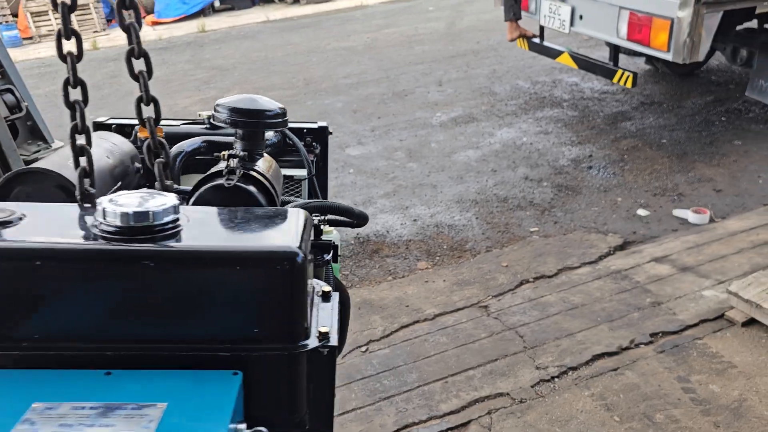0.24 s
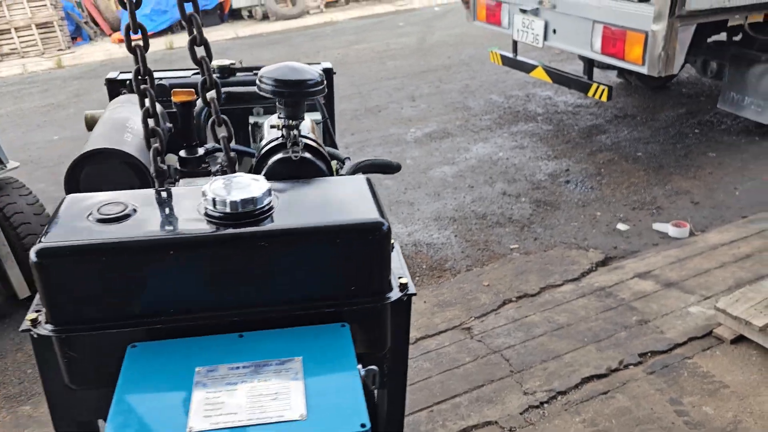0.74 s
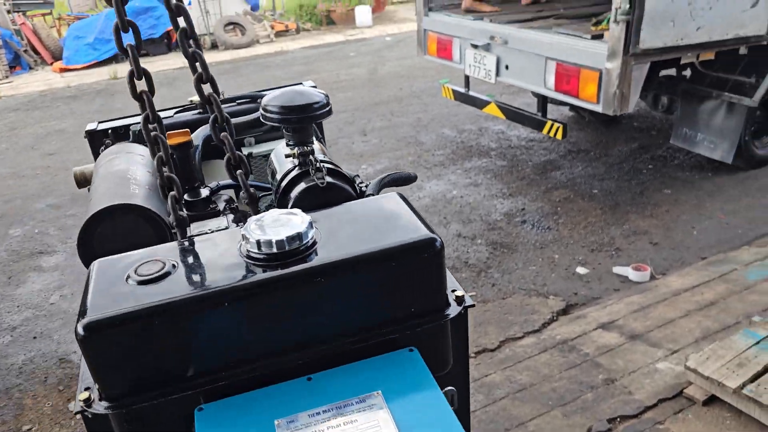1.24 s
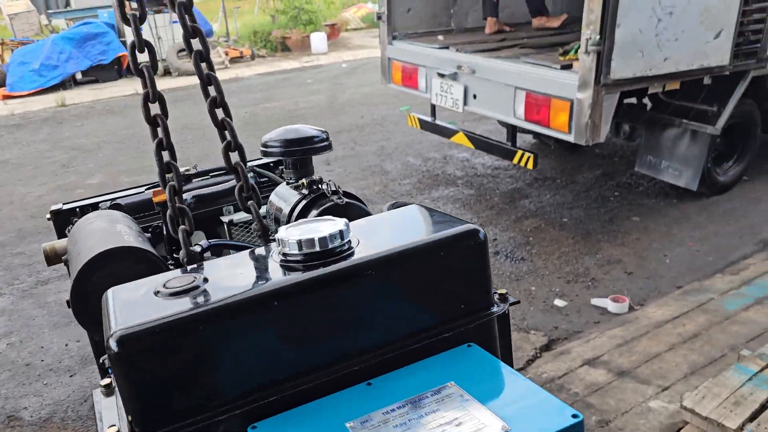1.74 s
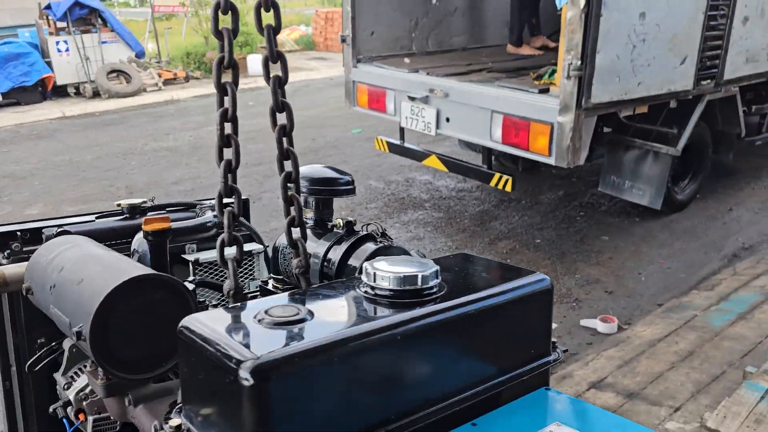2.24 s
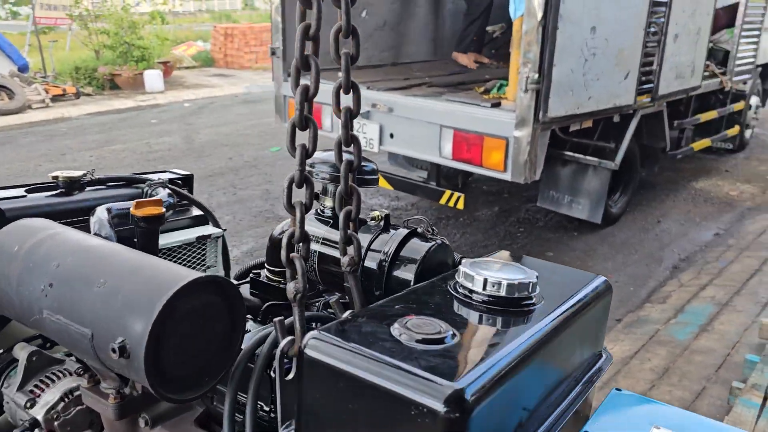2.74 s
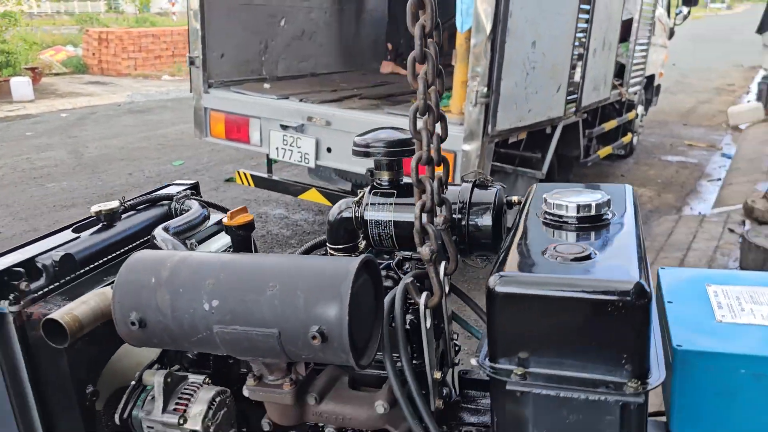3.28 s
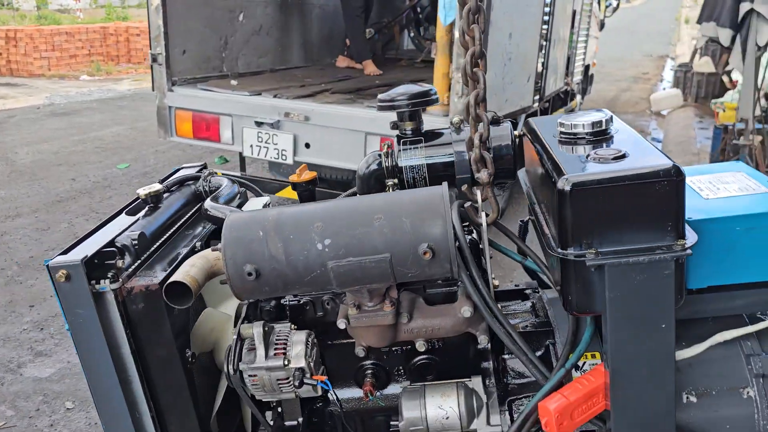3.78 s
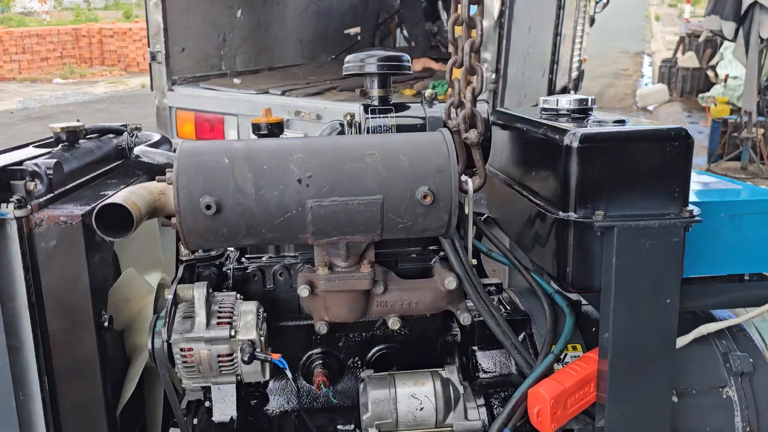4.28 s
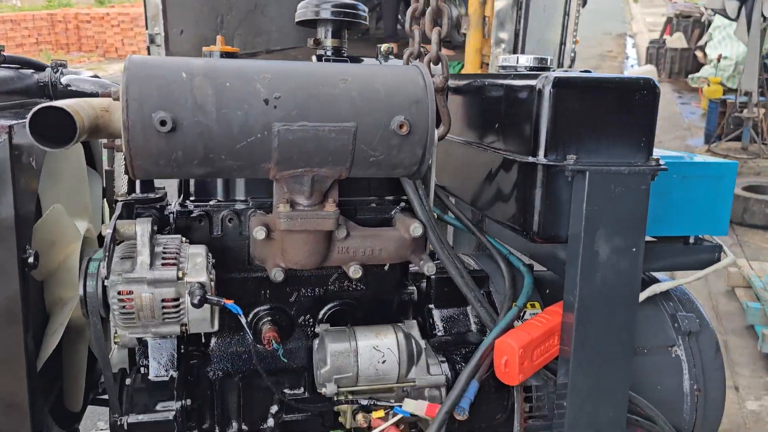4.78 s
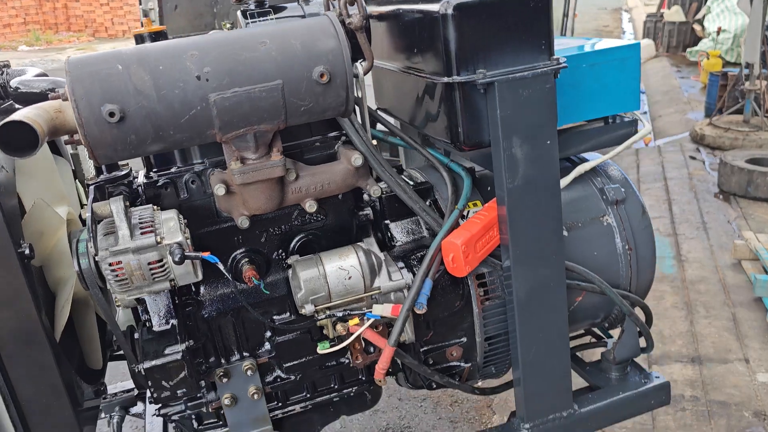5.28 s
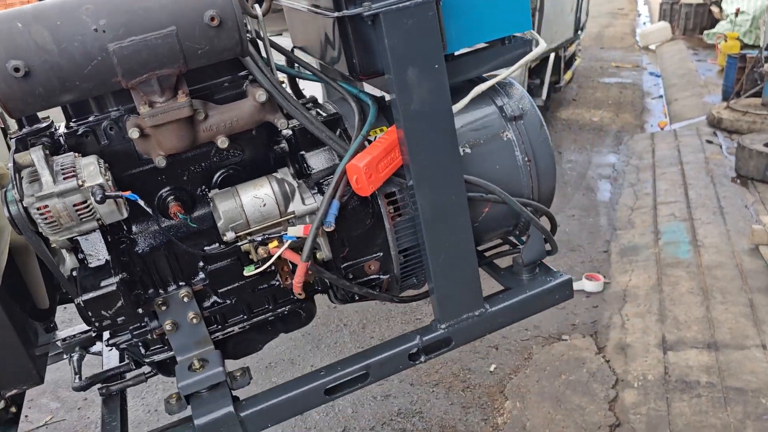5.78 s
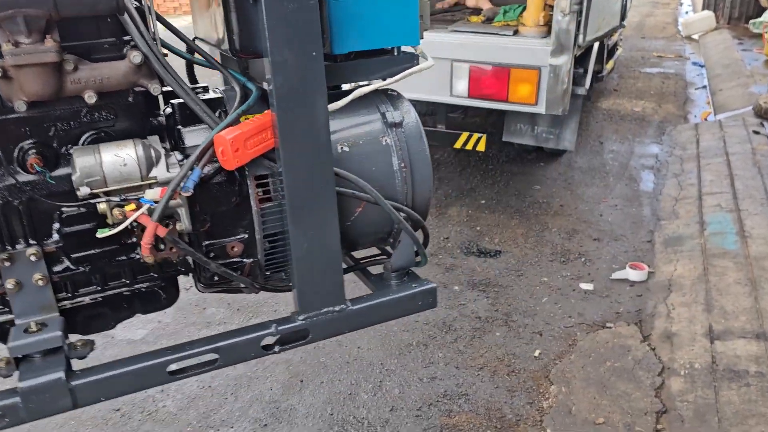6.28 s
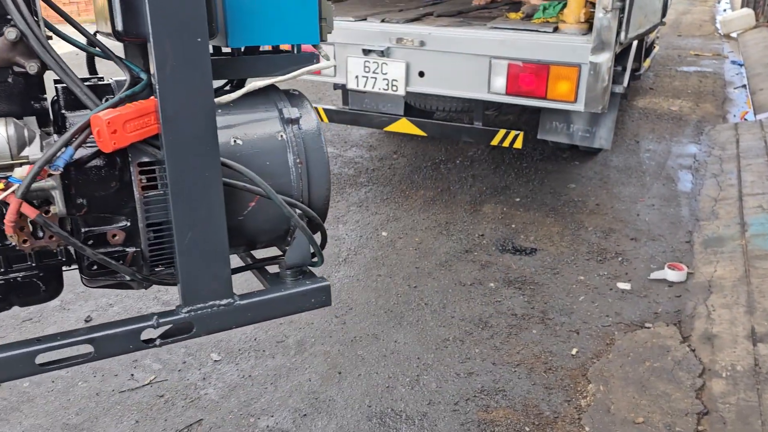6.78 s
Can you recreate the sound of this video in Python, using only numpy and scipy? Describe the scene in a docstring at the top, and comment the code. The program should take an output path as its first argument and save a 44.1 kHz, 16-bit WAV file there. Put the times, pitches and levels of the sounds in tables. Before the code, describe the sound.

A diesel forklift lifts a heavy load on chains, heard close up on a street with a faint rush of air behind. For the first two seconds the engine swells and sags in deep surges, about three a second, knocking, clattering and puffing exhaust. A high, raspy, turbine-like whine throbs with it throughout. A hydraulic valve hisses softly until about 3 seconds. At 0.7 seconds the chain snaps taut and the mast squeals thinly, with link clinks through 1.5 seconds. From 2 seconds the engine speeds up, with another chain clack near 2.4, then settles into steadier chugging by 3.5. The mast rubs in rough, falling tones from about 3.9 to 5.6 seconds, with a sharp clink at 4.4 and lighter ones around 6. Near 6.7 seconds the engine surges hard and the hanging load clanks once, with two clinks and a brief, lower squeal.

```python
"""A street, one microphone close to a diesel forklift hoisting an engine-driven generator on chains.
At first the engine hunts in deep surges: each firing knocks the block, puffs the exhaust and swells
a high turbine-like whine. Oil hisses in the lift valve; at 0.7 s the chain snaps taut, links clink
and the mast squeals. From 2 s the engine pulls up in speed, settling by 3.5 s; then the mast rubs
again. Near 6.7 s the engine surges hard and the hanging load clanks once."""
import sys
import numpy as np
from scipy import signal
from scipy.fft import rfft, irfft, next_fast_len
from scipy.io import wavfile
from scipy.ndimage import uniform_filter1d, minimum_filter1d, map_coordinates

SR = 44100
rng = np.random.default_rng(int(sys.argv[2]) if len(sys.argv) > 2 else 0)


def materialize(psi):
    """Save the field psi as 16-bit PCM at rate SR to the path in sys.argv[1].

    A 1-D psi becomes a single channel; in a 2-D psi each row is a channel.
    """
    bounded = np.clip(np.atleast_2d(psi).T, -1, 1)
    quanta = np.round(bounded * 32767).astype(np.int16)
    wavfile.write(sys.argv[1], SR, quanta)


N = 309582
TIME = np.arange(N) / SR
AGE = np.arange(8192) / SR  # seconds into one blow

# Levels in the tables are relative.
# mean crank speed: t/s, firing rate/Hz
FIRING_RATE = [(0.0, 21.816), (0.258, 22.152), (0.77, 21.775), (0.956, 20.936), (1.308, 20.655),
               (2.045, 23.772), (2.333, 24.694), (2.546, 25.205), (2.962, 25.837), (3.167, 24.127),
               (3.43, 20.476), (3.867, 20.775), (4.255, 20.133), (4.451, 20.699), (5.544, 20.637),
               (6.083, 20.541), (6.764, 20.737), (7.02, 19.031)]
# the hunting governor's fuel surges: t/s, knock/dB, clatter/dB, depth of the following sag/dB
SURGES = [(0.0, -39.5, -43, 12.5), (0.377, -23, -31, 28), (0.705, -18, -18.5, 27.0),
          (1.06, -10, -17.4, 32.5), (1.445, -10, -18, 24.5), (1.737, -12.5, -24, 10),
          (2.158, -14.5, -26.5, 7.5), (2.484, -15.5, -23.5, 6), (2.802, -15, -24.5, 3),
          (3.12, -15, -28, 4.5), (3.509, -15, -26.5, 2.0), (3.877, -11.5, -24.5, 4), (4.28, -12, -27, 5),
          (4.598, -12, -29, 1.9), (4.93, -13, -28, 7), (5.292, -10.5, -27, 8.5), (5.643, -11, -25.5, 11),
          (5.987, -14.5, -27.5, 6.5), (6.313, -16.5, -27.5, 15.5), (6.717, -8, -17, 24.0),
          (7.021, -12, -20, 23)]
# the four cylinders in firing order: knock/dB, clatter/dB
CYLINDERS = [(0.2, 2.8), (-1.1, 0.65), (-1.5, -1.5), (3.5, 2)]
# late ignitions, which knock hard: t/s, extra knock/dB
HARD_KNOCKS = [(.15, 9.5), (.335, 8), (.98, 6.5), (1.36, 9.5), (2.13, 3.5), (2.485, -0.5)]
# engine block resonances: f/Hz, width/Hz, level/dB
BLOCK_MODES = [(407.6, 20, -14.5), (499.1, 13.8, 3), (568.2, 19.3, -3), (695, 8.7, -21), (748.3, 14, -10),
               (788, 11, -4), (863.3, 15.1, -8)]
# clatter of the covers and valve gear: f/Hz, level/dB
COVER_SPECTRUM = [(300, -16), (600, 11), (950, 3), (1170, -4), (1340, 4.5), (1620, 2.5), (1850, -4),
                  (2150, -5), (2500, -13.5), (3500, -9.5), (4400, -32), (5600, -22.5), (6300, -33.5),
                  (6900, -67.5)]
# sheet-metal panel resonances: f/Hz, width/Hz, level/dB
PANEL_MODES = [(1308, 53, 9.5), (1470, 130, 5), (1660, 77, 1.5), (1950, 56, -13.5), (3520, 230, -9)]
# the panels' share of the clatter: t/s, level/dB
PANEL_LEVEL = [(0, -3.5), (3, -5.5), (4.5, 1.5), (6.5, 9)]
# exhaust at the crest of a surge: t/s, tailpipe thump/dB, silencer boom/dB
EXHAUST_LEVEL = [(0, -42.5, -39), (.42, -23.5, -32), (.8, -25, -25.5), (1.12, -22, -21.5),
                 (1.5, -22, -19.5), (1.9, -21.5, -17.5), (2.9, -16.5, -13), (3.4, -19.5, -19),
                 (4.3, -19.5, -19.5), (5.45, -17, -22), (5.6, -25.5, -36.5), (5.95, -35, -31.5),
                 (6.8, -29, -31), (7.02, -26, -27)]
# tailpipe resonances: f/Hz, width/Hz, level/dB
TAILPIPE_MODES = [(53.6, 17.5, -0.88), (85.8, 30, -0.2), (101.6, 15.2, -0.27)]
# silencer resonances: f/Hz, width/Hz, level/dB
SILENCER_MODES = [(176.1, 47, 2.5), (195.6, 29.1, 7.5), (272, 11, -8.5), (358, 150, -13)]
# brightness of the silencer's boom: t/s, tilt/(dB per octave)
BOOM_TILT = [(.4, 4), (2.2, 2), (3.3, -1.5), (5, -7), (7, 0.5)]
# whine pitch at the crest of a surge: t/s, f/Hz
WHINE_PITCH = [(0.0, 3905), (0.3, 3396), (0.85, 3180), (1.05, 2945), (1.4, 2853), (2.1, 2842), (2.3, 2960),
               (2.8, 3054), (3.0, 3184), (3.3, 3142), (3.55, 2964), (4.2, 2852), (4.55, 2747), (5.9, 2752),
               (6.8, 2802.0), (7.02, 2784)]
# whine strength at the crest of a surge: t/s, fundamental/dB, octave/dB
WHINE_LEVEL = [(0.0, -38, -77.3), (0.25, -23, -75), (0.55, -17.5, -59.5), (0.72, -20, -35),
               (1.1, -20, -25.5), (2.2, -25.5, -29.5), (2.55, -22.5, -27.5), (3.2, -26, -39.5),
               (3.7, -19.5, -31), (4.05, -17.5, -34.5), (4.5, -27.5, -37), (5.45, -19.5, -32.5),
               (6.2, -25.5, -38.4), (6.45, -18.5, -28), (7.02, -17, -26.5)]
# chain links settling: t/s, level/dB
CLINKS = [(0.7402, -13), (1.0909, -10.5), (1.477, -7.5), (4.3615, -2.5), (5.7189, -24.5), (6.0591, -16.5),
          (6.4009, -10), (6.7426, -2.5), (6.7915, -1.5)]
# ring of one link: f/Hz, level/dB, t60/s
LINK_MODES = [(4770, -13, 0.02), (5030, -7.5, 0.026), (4900, 5, 0.03), (5160, 1.5, 0.056),
              (6130, -13.5, .03)]
# the hanging frame shifts: t/s, level/dB
CLANKS = [(6.682, -5.5)]
# ring of the frame: f/Hz, level/dB, t60/s
FRAME_MODES = [(704, -10, 0.13), (1140, -12, 0.27), (1410, -4, 0.17), (1970, -4, 0.29)]
# the chain snaps taut: t/s, level/dB
SNAPS = [(0.741, -21), (2.441, -17)]
# mast and lift cylinder rubbing: start t/s, end t/s, start f/Hz, end f/Hz, level/dB
RUBS = [(0.734, 1.024, 2280, 2010, -31), (1.03, 1.277, 2186, 2223, -27), (4.248, 4.501, 915, 890, -24.5),
        (3.901, 5.6, 1205, 977, -29), (5.031, 5.3, 902, 840, -19), (6.663, 6.813, 770, 701, -12.5),
        (6.681, 6.79, 631, 549, -18.5)]
# oil hissing through the lift valve: t/s, level/dB
OIL_LEVEL = [(0, -47), (.3, -53.5), (.48, -40), (.62, -45.5), (1.1, -41.5), (1.3, -45), (1.9, -38),
             (3.5, -59)]
# colour of that hiss: f/Hz, level/dB
OIL_SPECTRUM = [(1200, -21), (1800, 2.5), (2250, -2.5), (2480, -12), (2700, -24.5), (5000, -42)]
# fan and street air: f/Hz, level/dB
AIR_SPECTRUM = [(20, -18.5), (60, -2.5), (200, 6.5), (800, -12.5), (2000, -16), (4000, -37.5), (7200, -64)]

RISE_SHARE = .41  # part of a surge cycle in which the fuel returns
KICK = .26  # extra dB of knock per dB of rise since the last firing
KNOCK_SCATTER_DB, CLATTER_SCATTER_DB, BOOM_SCATTER_DB = 1.07, 1.28, 2.05  # from firing to firing
THUMP_SAG, BOOM_SAG, WHINE_SAG, OCTAVE_SAG = .73, .69, .62, .97  # dB lost per dB of fuel sag
EXHAUST_LAG_S, WHINE_LAG_S, SPOOL_LAG_S = .055, .037, .08  # delays behind the fuel
SAG_HZ_PER_DB = 6  # the turbine slows as the fuel sags
SWING_CYCLES_PER_DB, SWING_LAG = .0021, .305  # crank swing per dB of sag depth; lag in surge cycles


def engine(fired):
    """The main source, close up: combustion rings the block, and the covers clatter with it."""
    knock_db, clatter_db = combustion(fired)
    knocks, rattles = block_knock(fired, knock_db), clatter(fired, clatter_db)
    lit = fired + .0007 * rng.standard_normal(len(fired))  # ignition lag differs from stroke to stroke
    return train(lit, knocks, knock_db, delay=.0026) + train(lit, rattles, clatter_db + 3.04, delay=-.001)


def crank():
    """Firing cycles turned so far, and the firing times; every surge swings the crank ahead and back."""
    phase = surge_phase(TIME)
    depth_db = np.interp(phase - .5, np.arange(len(SURGES)), np.transpose(SURGES)[3])
    swing = SWING_CYCLES_PER_DB * depth_db * np.sin(2 * np.pi * (phase - SWING_LAG))
    cycles = np.cumsum(curves(FIRING_RATE, TIME)[0]) / SR + swing - .36
    return cycles, TIME[1:][np.diff(np.floor(cycles)) > 0]


def surge_phase(at):
    """Surges passed so far, with the fraction of the present one."""
    return np.interp(at, np.transpose(SURGES)[0], np.arange(len(SURGES)))


def fuel_sag(at):
    """How many dB the fuel has fallen: it runs down after a surge and climbs back to the next."""
    passed, part = np.divmod(surge_phase(at), 1)
    depth_db = np.transpose(SURGES)[3][passed.astype(int)]
    return depth_db * np.minimum(part / (1 - RISE_SHARE), (1 - part) / RISE_SHARE)


def combustion(fired):
    """Knock and clatter dB of each firing: the fuel, its cylinder and a little chance."""
    knock_db, clatter_db, _ = curves(SURGES, fired)
    sag_db = fuel_sag(fired)
    knock_db -= sag_db
    knock_db += KICK * np.maximum(np.diff(knock_db, prepend=knock_db[0]), 0)
    for time, extra_db in HARD_KNOCKS:
        knock_db[np.argmin(np.abs(fired - time))] += extra_db
    own_knock_db, own_clatter_db = np.array(CYLINDERS)[np.arange(len(fired)) % len(CYLINDERS)].T
    chance = rng.standard_normal((len(fired), 2)).T
    return (knock_db + own_knock_db + KNOCK_SCATTER_DB * chance[0],
            clatter_db - sag_db + own_clatter_db + CLATTER_SCATTER_DB * chance[1])


def block_knock(fired, knock_db):
    """Each firing rings the block, brighter at the start of a surge, at speed and on soft firings."""
    rise_db = np.clip(np.diff(knock_db, prepend=-45), 0, 18)
    softness_db = np.maximum(-17.5 - knock_db, 0)
    tilt = .5 * rise_db + 1.3 * (curves(FIRING_RATE, fired)[0] - 21) + .53 * softness_db - 1
    push = blows(fired, rough=.73, rise=.001, t60=.084)
    return filtered(push, resonances(BLOCK_MODES, len(fired), spread_db=4, tilt=tilt[:, None]))


def clatter(fired, clatter_db):
    """Piston slap and valve gear rattle the covers and ring the sheet-metal panels."""
    # the hardest firings are also the brightest, the softest are dull
    bright = amp(np.clip(1.6 * (clatter_db + 23.5), -20, 5))[:, None]
    dull = amp(np.clip(.92 * (clatter_db + 29), -12, 0))[:, None]
    above = lambda hz, edge_hz, order=4: hz ** order / (hz ** order + edge_hz ** order)
    treble = lambda hz: (1 + bright * above(hz, 1200)) * (1 + (dull - 1) * above(hz, 850))
    panels = resonances(PANEL_MODES, len(fired), spread_db=8.5)
    panel_gain = amp(curves(PANEL_LEVEL, fired)[0])[:, None]
    # the panels radiate little outside their own range
    band = lambda hz: above(hz, 1100., order=8) / (1 + (hz / 3900) ** 14)
    slap = (1 - np.exp(-(AGE / .006) ** 2)) * (decay(t60=.11) + amp(-16) * decay(t60=.39))
    grit = lambda: slap * rng.standard_normal((len(fired), len(AGE)))
    covers = filtered(grit(), lambda hz: amp(-3) * colour(COVER_SPECTRUM)(hz) * treble(hz))
    return covers + panel_gain * filtered(grit(), lambda hz: panels(hz) * band(hz))


def exhaust(fired):
    """Every puff thumps in the tailpipe and booms in the silencer."""
    thump_db, boom_db = curves(EXHAUST_LEVEL, fired)
    sag_db = fuel_sag(fired - EXHAUST_LAG_S)
    thump_db -= THUMP_SAG * sag_db
    boom_db += BOOM_SCATTER_DB * rng.standard_normal(len(fired)) - BOOM_SAG * sag_db
    # faster running sharpens the puffs and feeds the pipe's upper resonance
    pipe_tilt = 2 * np.clip(curves(FIRING_RATE, fired)[0] - 21, 0, 6)[:, None]
    pipe = resonances(TAILPIPE_MODES, len(fired), spread_db=1.2, tilt=pipe_tilt)
    thump = filtered(blows(fired, rough=.045, rise=.0025, t60=.16), pipe)
    thump = signal.sosfilt(signal.butter(3, [40, 190], "band", fs=SR, output="sos"), thump)
    boom_tilt = curves(BOOM_TILT, fired)[0][:, None]
    silencer = resonances(SILENCER_MODES, len(fired), spread_db=1.5, tilt=boom_tilt)
    boom = filtered(blows(fired, rough=.8, rise=.0044, t60=.11), silencer)
    # the thump and boom start a little early, so each swells to its peak just after the firing
    return train(fired, thump, thump_db, delay=-.01743) + train(fired, boom, boom_db, delay=-.00071)


def turbine_whine(cycles):
    """Each exhaust puff speeds up the turbine and swells its raspy whistle, which sags until the next."""
    pitch = curves(WHINE_PITCH, TIME)[0] - SAG_HZ_PER_DB * fuel_sag(TIME - SPOOL_LAG_S)
    first_db, octave_db = curves(WHINE_LEVEL, TIME)
    sag_db = fuel_sag(TIME - WHINE_LAG_S)
    sway = .01 * np.cos(2 * np.pi * (cycles + .082)) + .011 * wobble(450)
    phase = 2 * np.pi * np.cumsum(pitch * (1 + sway)) / SR
    # at speed the puffs run together, and in a lull the turbine coasts smoothly
    steady = .012 + .006 * np.maximum(curves(FIRING_RATE, TIME)[0] - 21, 0)
    steady += .0016 * np.maximum(sag_db - 14, 0)

    def throb(lead, rise, fall):
        """One swell per firing above the steady level; times in cycles."""
        part = (cycles + lead) % 1
        return unit(steady + (1 - np.exp(-(part / rise) ** 2)) * np.exp(-part / fall))

    def rasp(harmonic, rough):
        """A harmonic that flutters in level and phase."""
        flutter = lambda: rough * wobble(300 * harmonic)
        return unit(np.sin(harmonic * phase) * (1 + flutter()) + flutter() * np.cos(harmonic * phase))

    first_gain = amp(first_db - WHINE_SAG * sag_db - 2) * throb(lead=.07, rise=.24, fall=.13)
    octave_gain = amp(octave_db - OCTAVE_SAG * sag_db - .5) * throb(lead=.015, rise=.1, fall=.21)
    return first_gain * rasp(1, rough=.44) + octave_gain * rasp(2, rough=.43)


def chain_clinks():
    """Links settle under the load with a short, high ring."""
    links = struck_steel(CLINKS, LINK_MODES, scrape_t60=.063)
    return filtered(links, colour([(3000, -5.5), (4500, -3.5), (5500, -5), (6800, -27)]))


def load_clank():
    """The generator's hanging frame shifts and rings."""
    return struck_steel(CLANKS, FRAME_MODES, scrape_t60=.11)


def chain_snaps():
    """A link jerks into place with a dry clack."""
    times, db = np.transpose(SNAPS)
    clack = colour([(1500, -22.5), (3600, 7), (5300, 2), (6800, -29)])
    noise = unit(filtered(rng.standard_normal((len(times), len(AGE))), clack))
    return place(times, amp(db)[:, None] * noise * decay(t60=.051))


def mast_squeal():
    """The mast rubs in rough, mostly falling tones as it takes the weight."""
    squeal = np.zeros(N)
    grip = .18 + wobble(170) + 1j * wobble(170)
    for start, end, from_hz, to_hz, db in RUBS:
        progress = np.clip((TIME - start) / (end - start), 0, 1)
        phase = 2 * np.pi * np.cumsum(from_hz + (to_hz - from_hz) * progress) / SR
        tone = unit(grip.real * np.sin(phase) + grip.imag * np.cos(phase))
        squeal += amp(db) * np.sin(np.pi * progress) * tone
    return squeal


def oil_hiss():
    """The lift valve hisses in a narrow band while the load comes off the ground."""
    return amp(curves(OIL_LEVEL, TIME)[0]) * unit(filtered(rng.standard_normal(N), colour(OIL_SPECTRUM)))


def street_echo(sound):
    """Nearby walls and a parked lorry scatter a short answer back to the microphone."""
    walls = colour([(100, -11.5), (500, -9.5), (3000, -4), (7000, -4)])
    tail = filtered(rng.standard_normal(len(AGE)), walls) * decay(t60=.31) * (AGE > .006)
    return signal.fftconvolve(sound, tail / np.linalg.norm(tail))[:N]


def background_air():
    """A soft, steady rush of fan and street behind the machine."""
    return amp(-48.5) * unit(filtered(rng.standard_normal(N), colour(AIR_SPECTRUM)))


def blows(fired, rough, rise, t60):
    """One push per firing: a blunt kick and a dying rattle; rough is the rattle's share."""
    noise = rng.standard_normal((len(fired), len(AGE)))
    rattle = unit(noise * (1 - np.exp(-AGE / rise)) * decay(t60))
    push = np.sqrt(rough) * rattle + np.sqrt(1 - rough) * unit(1. * (AGE == 0))
    return signal.sosfilt(signal.butter(4, 1100, fs=SR, output="sos"), push)


def resonances(modes, count, spread_db, tilt=0.):
    """Responses for count firings, each shaking the modes at new strengths; tilt in dB per octave."""
    gains = [amp(db + spread_db * rng.standard_normal((count, 1)) + tilt * np.log2(hz / 600))
             for hz, _, db in modes]
    return lambda f: sum((-1) ** k * gains[k] * 1j * f * width / (hz * hz - f * f + 1j * f * width)
                         for k, (hz, width, _) in enumerate(modes))


def struck_steel(events, modes, scrape_t60):
    """Steel rings under a short, rough scrape as it seats."""
    age = np.arange(SR // 2) / SR
    hz, db, t60 = np.transpose(modes)
    ring = amp(db) @ (np.sin(2 * np.pi * hz[:, None] * age) * decay(t60[:, None], age))
    times, peak_db = np.transpose(events)
    scrapes = rng.standard_normal((len(times), len(age))) * decay(scrape_t60, age)
    sounds = signal.fftconvolve(scrapes, ring[None], axes=1)[:, :len(age)]
    return place(times, amp(peak_db)[:, None] * sounds / np.abs(sounds).max(axis=1, keepdims=True))


def train(fired, sounds, db, delay):
    """One sound per firing, sized so that its cycle has the given rms level."""
    cycle_s = 1 / curves(FIRING_RATE, fired)[0]
    return place(fired + delay, unit(sounds) * (amp(db) * np.sqrt(cycle_s / AGE[-1]))[:, None])


def place(times, sounds):
    """Sum of sounds, each starting at its time."""
    index = np.round(times * SR).astype(int)[:, None] + np.arange(sounds.shape[1])
    inside = (index >= 0) & (index < N)
    return np.bincount(index[inside], sounds[inside], N)


def filtered(x, response):
    """Rows of x through a complex frequency response."""
    size = x.shape[-1]
    padded = next_fast_len(size + 4096)
    return irfft(rfft(x, padded) * response(np.fft.rfftfreq(padded, 1 / SR)), padded)[..., :size]


def colour(points):
    """Response through (f/Hz, level/dB) points on a log axis."""
    f, db = np.transpose(points)
    return lambda hz: amp(np.interp(np.log(hz + 1), np.log(f), db))


def curves(rows, at):
    """Each column after the time, read at the given times."""
    times, *columns = np.transpose(rows)
    return [np.interp(at, times, column) for column in columns]


def wobble(rate):
    """A smooth random curve, rate knots a second."""
    return map_coordinates(rng.standard_normal(int(N * rate / SR) + 4), [TIME * rate])


def decay(t60, age=AGE):
    """A fall of 60 dB every t60 seconds."""
    return amp(-60 * age / t60)


def amp(db):
    """Decibels to gain."""
    return 10 ** (np.asarray(db) / 20)


def unit(x):
    """Each row at rms 1."""
    return x / np.sqrt(np.mean(x ** 2, axis=-1, keepdims=True) + 1e-20)


def scene():
    """At the microphone: engine and exhaust direct, whine and lifting gear with a little street echo."""
    cycles, fired = crank()
    steel = chain_clinks() + load_clank() + chain_snaps()
    bright = turbine_whine(cycles) + steel + mast_squeal() + oil_hiss()
    air = background_air()
    return (engine(fired) + exhaust(fired) + bright + amp(-10) * street_echo(bright) + air)[None]


def record(dry):
    """After the microphone, a fast limiter holds the peaks and a steep low-pass cuts at 7 kHz."""
    needed = np.minimum(1, .98 / (np.abs(dry) + 1e-9))
    gain = uniform_filter1d(minimum_filter1d(needed, size=130), size=130)
    return filtered(dry * gain, lambda hz: 1 / (1 + (hz / 7000) ** 60))


dry = scene()
out = record(dry)
materialize(out)
```